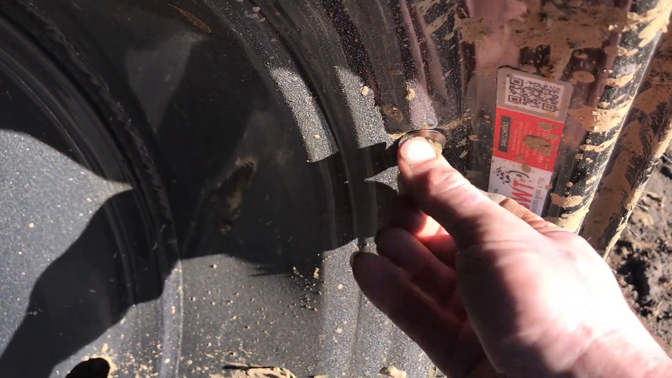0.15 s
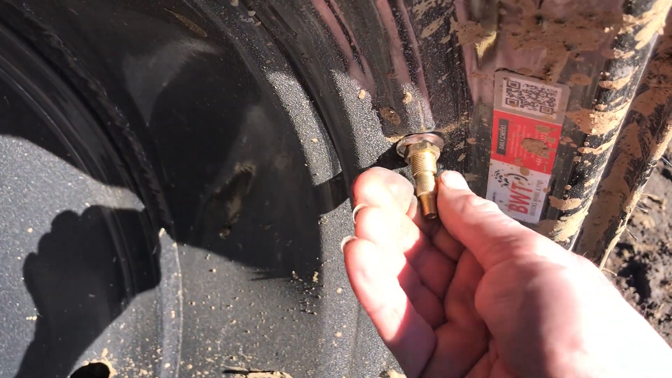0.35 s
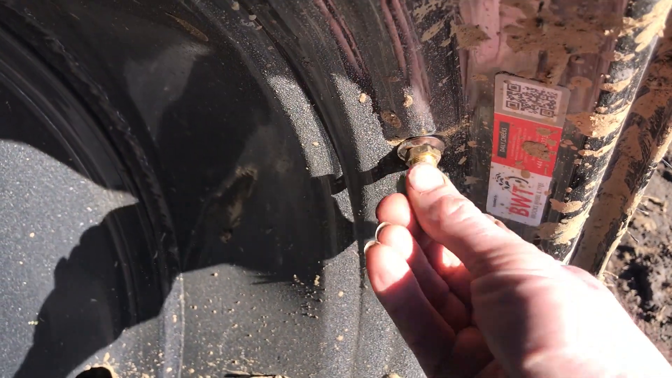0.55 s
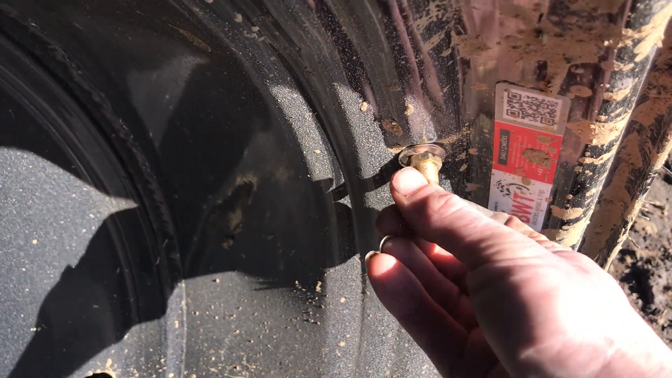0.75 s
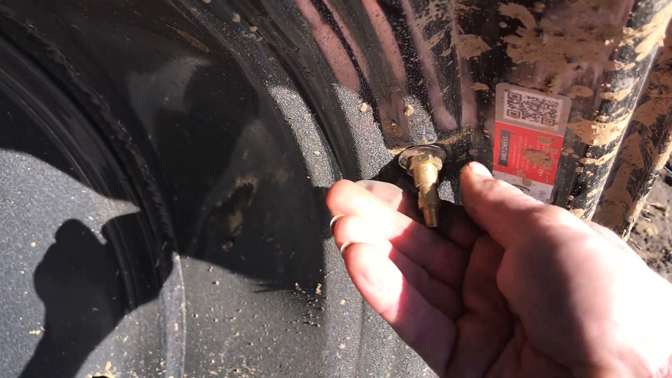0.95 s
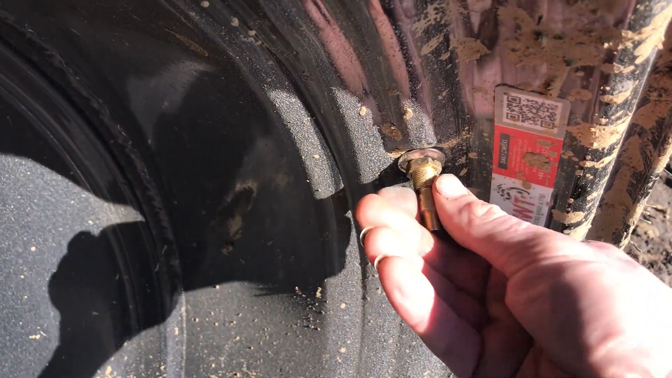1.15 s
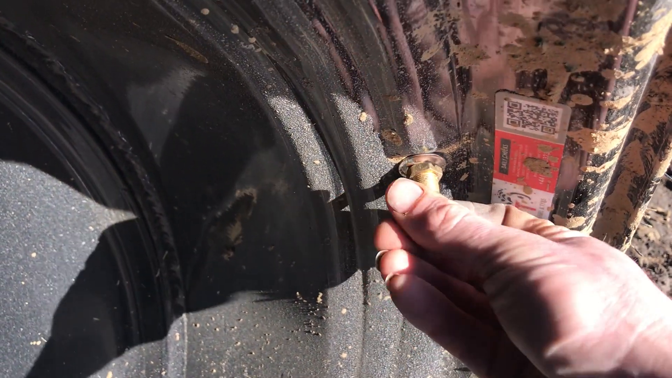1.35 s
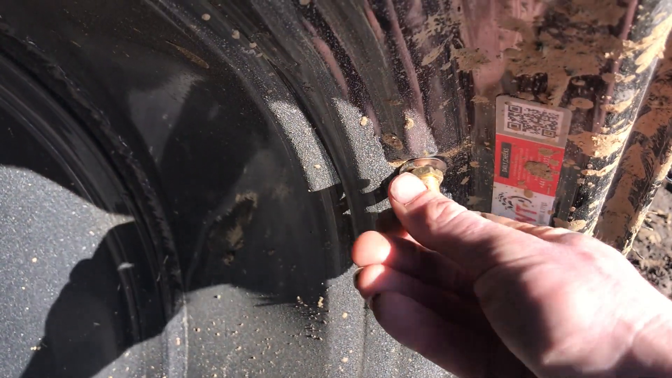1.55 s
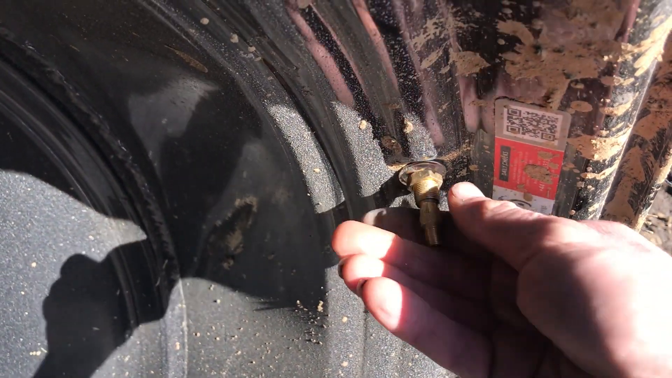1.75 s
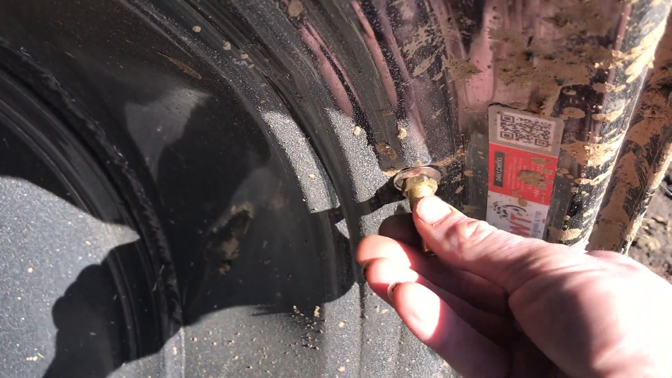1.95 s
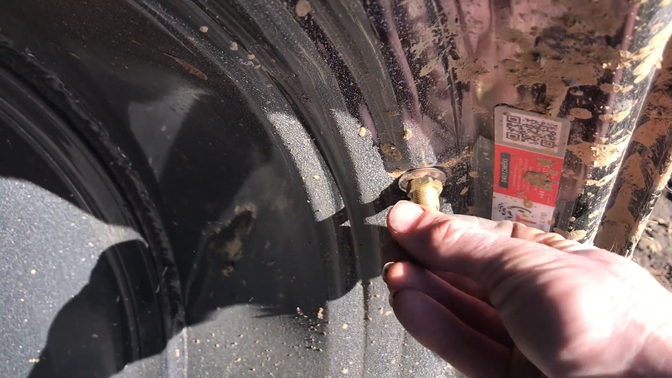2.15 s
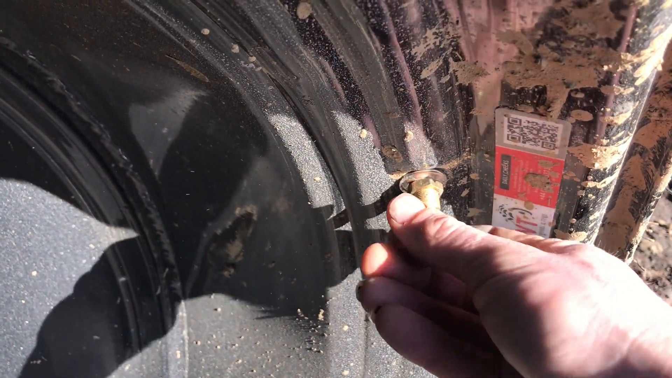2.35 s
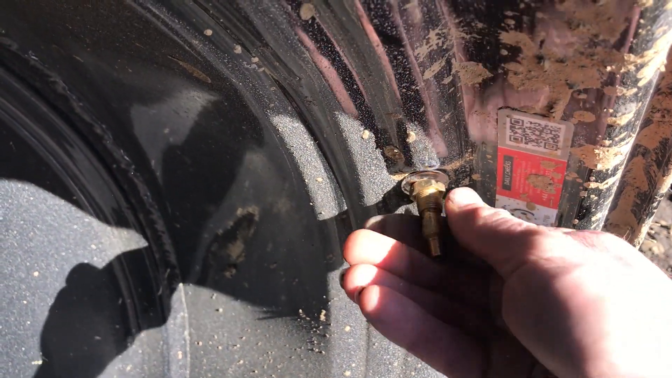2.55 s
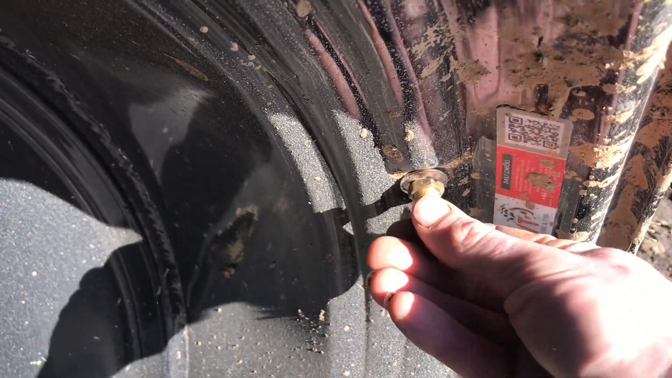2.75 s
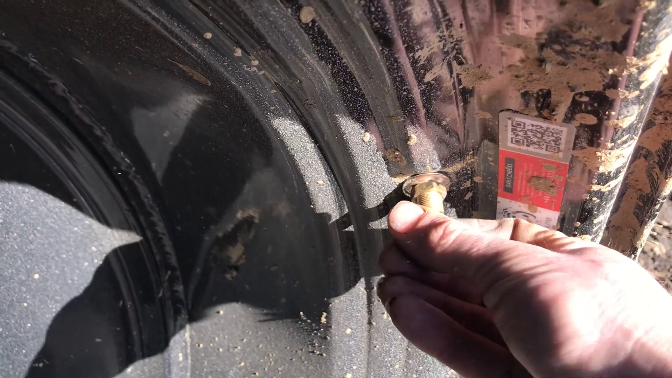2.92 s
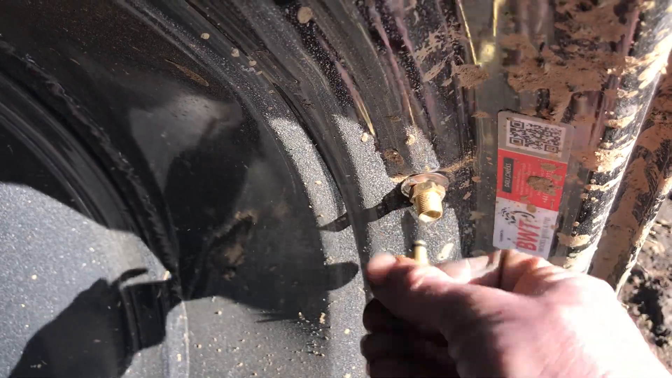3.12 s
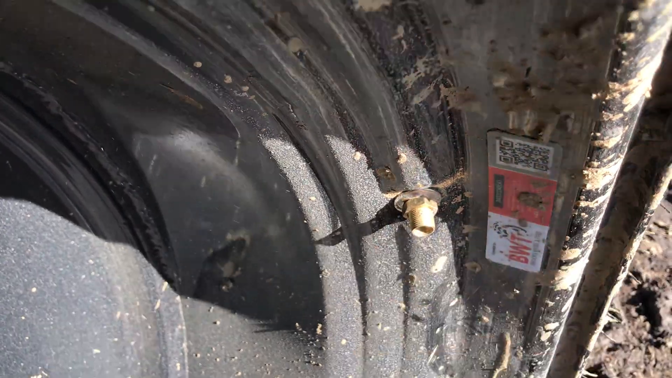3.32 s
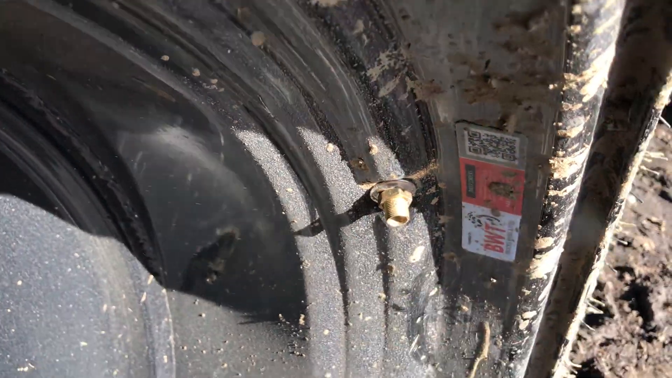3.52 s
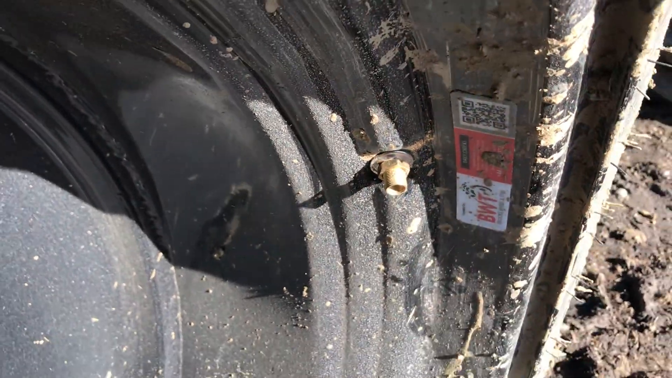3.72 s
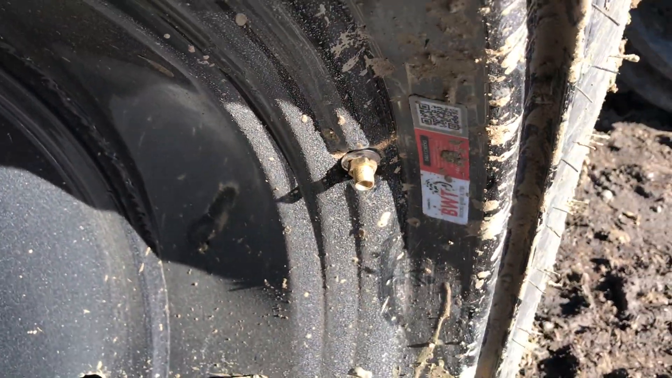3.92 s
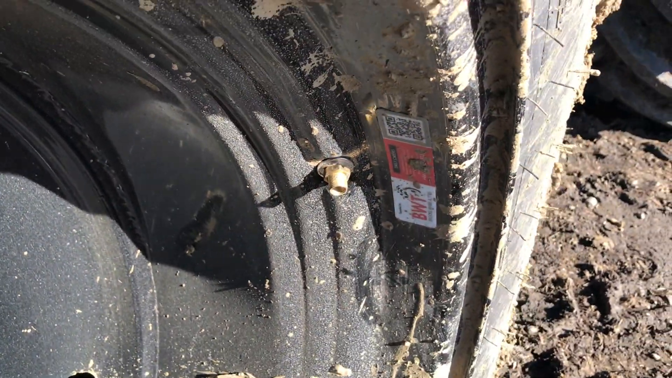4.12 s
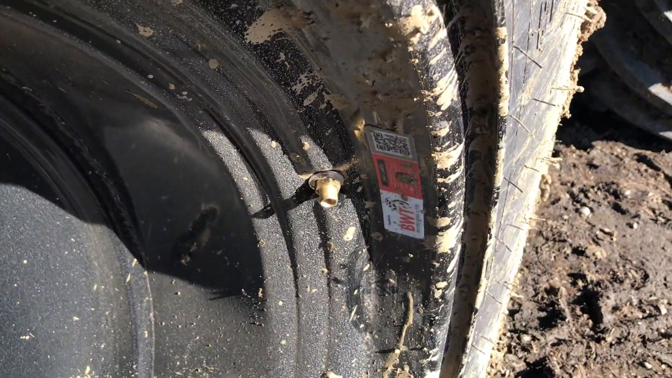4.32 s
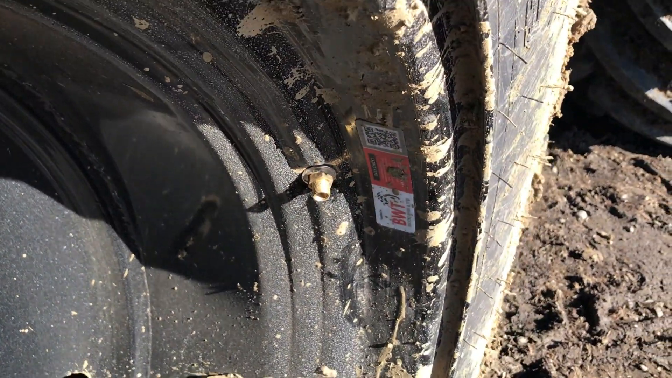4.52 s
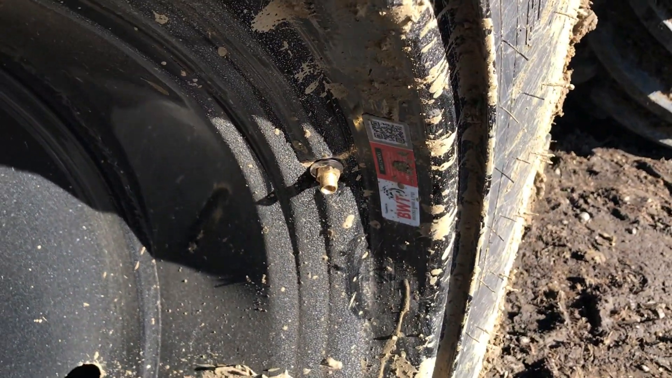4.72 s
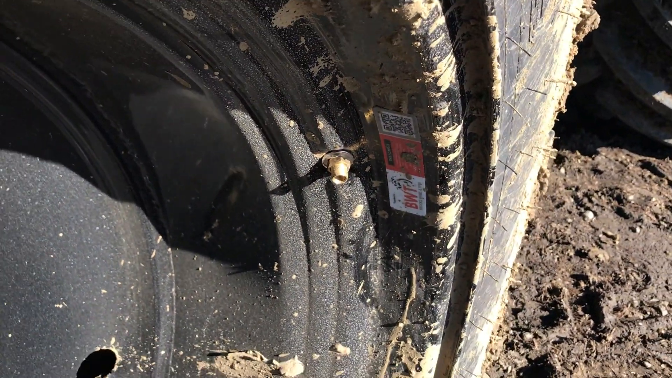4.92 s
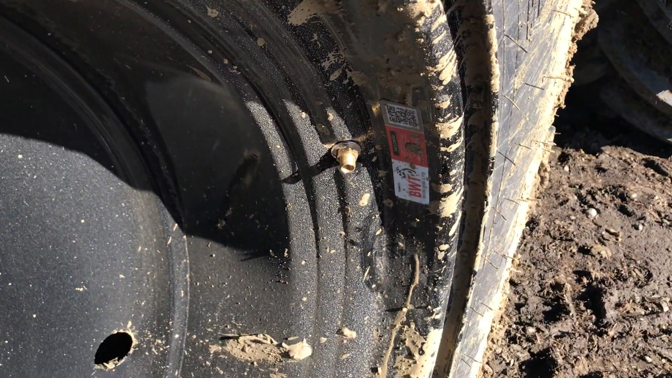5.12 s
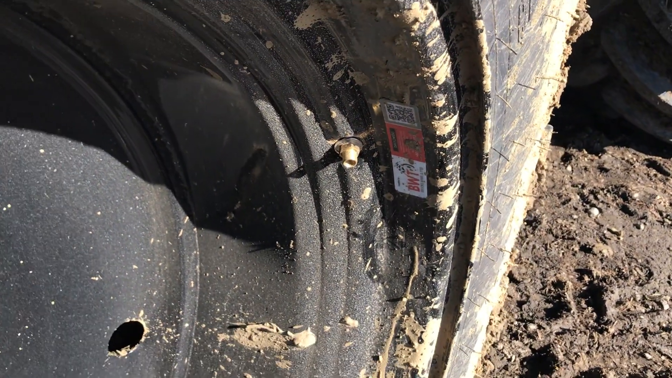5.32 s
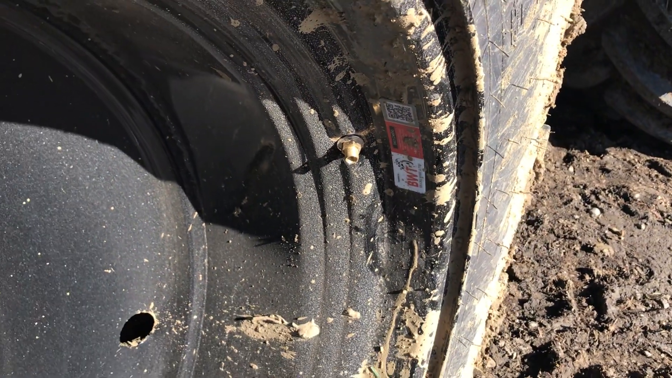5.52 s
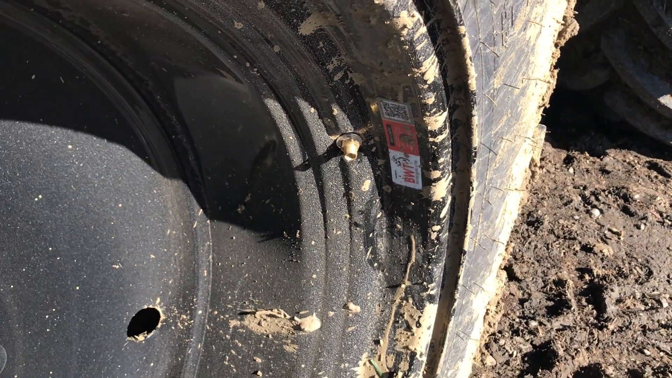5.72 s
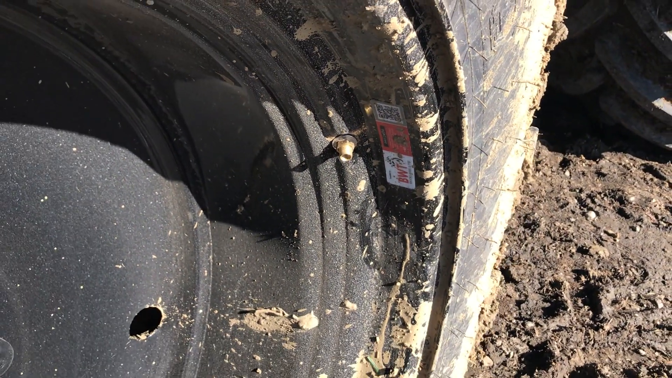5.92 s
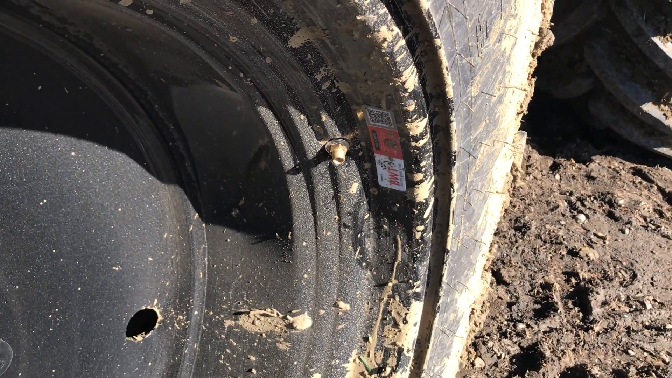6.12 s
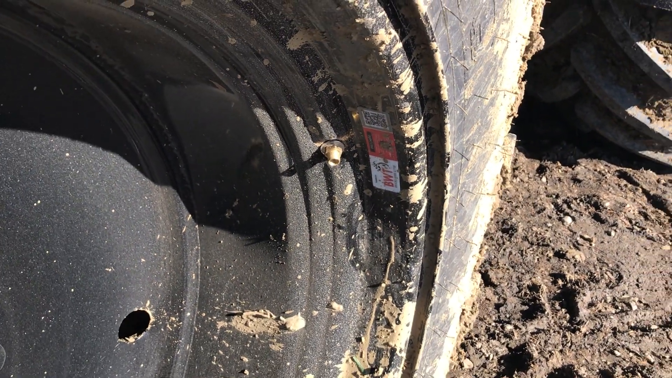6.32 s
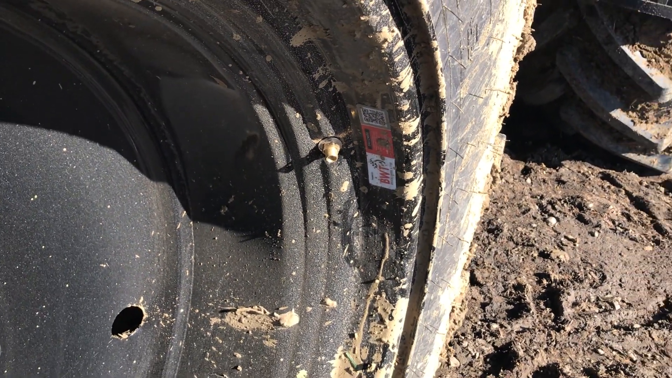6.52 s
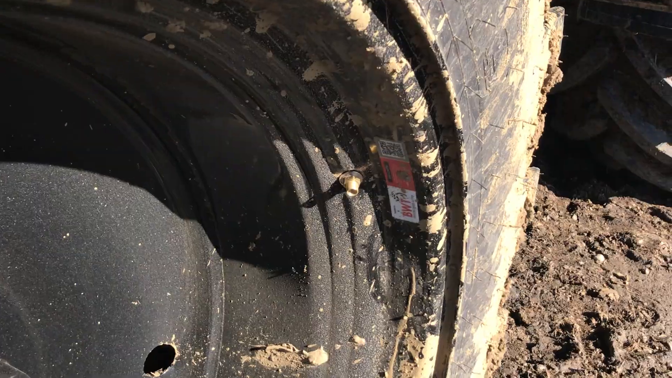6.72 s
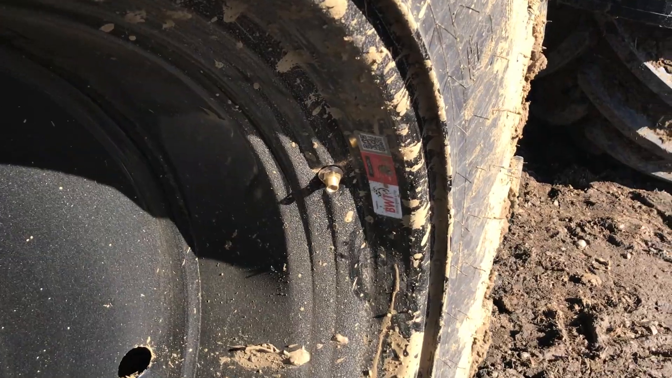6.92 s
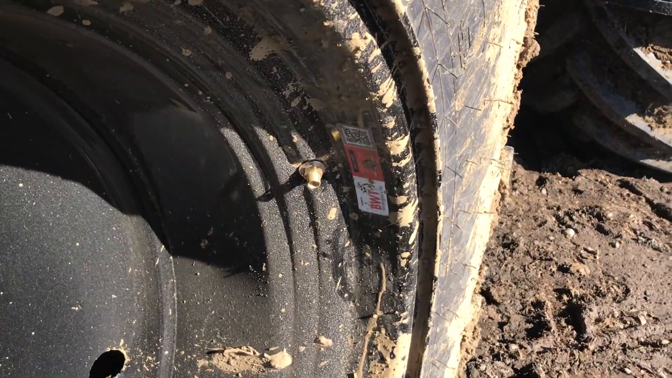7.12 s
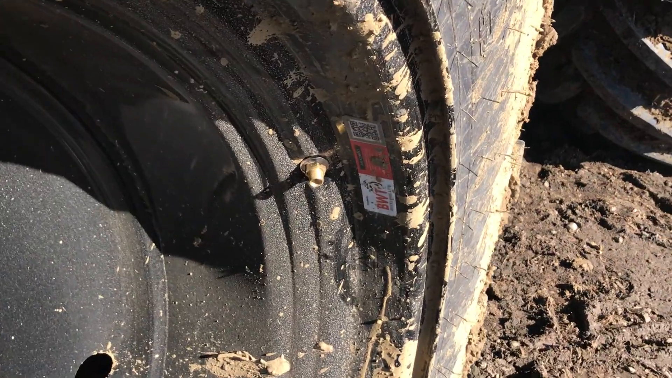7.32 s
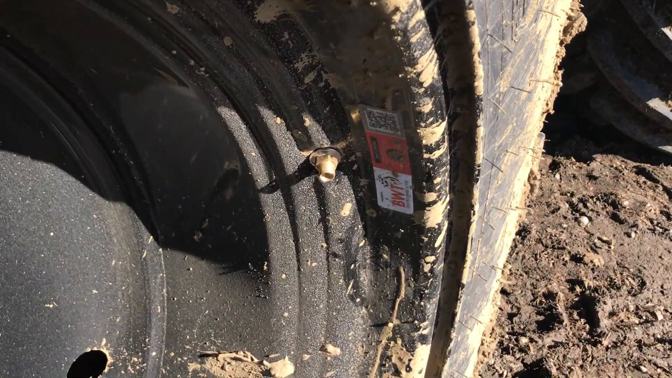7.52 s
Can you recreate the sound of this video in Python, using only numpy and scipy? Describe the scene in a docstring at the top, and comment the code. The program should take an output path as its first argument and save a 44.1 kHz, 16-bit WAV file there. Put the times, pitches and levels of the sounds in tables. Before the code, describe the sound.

Fingers rub and tick at a brass tyre valve, air seeping in wisps, then a pop, a roaring burst and a long steady hiss.

```python
"""An engine idles some way off in a farmyard while fingers rub on a tractor tyre's brass valve.
They slowly unscrew its core: air seeps past the thread in wisps, the core ticks, and the air spurts.
Then the core comes free with a pop, the jet roars against the hand, and the open valve hisses on.
The engine is a set of sines over rumble; air is coloured noise; rubs and ticks are short ringing bursts.
Heard close, in mono, with echoes from the wheel and the ground."""
import sys
import numpy as np
from scipy import signal
from scipy.fft import rfft, irfft, next_fast_len
from scipy.io import wavfile
from scipy.ndimage import map_coordinates

SR = 44100
rng = np.random.default_rng(int(sys.argv[2]) if len(sys.argv) > 2 else 0)


def dump(signal):
    """Clip the signal to [-1, 1] and save it as 16-bit WAV at the path in sys.argv[1]."""
    limited = np.clip(np.atleast_2d(signal).T, -1, 1)
    pcm = np.round(limited * 32767).astype(np.int16)
    wavfile.write(sys.argv[1], SR, pcm)


N = 333396
TIME = np.arange(N) / SR
CUTOFF_HZ = 15750   # top edge of the whole sound
OPEN_S, HAND_LEAVES_S = 3.1235, 3.309   # the core comes free; the hand starts to leave the jet


def from_db(db):
    """Decibels to gain."""
    return 10 ** (np.asarray(db) / 20)


def rms_one(x):
    """Scale to unit rms."""
    return x / np.sqrt(np.mean(x ** 2) + 1e-20)


def in_time(rows):
    """Each column of a table, after its times, as a curve with a value at every sample."""
    s, *columns = np.transpose(rows)
    return [np.interp(TIME, s, c) for c in columns]


def between(start, end, rise, fall):
    """A gate that opens at start and is closed by end, with straight ramps inside."""
    return np.clip((TIME - start) / rise, 0, 1) * np.clip((end - TIME) / fall, 0, 1)


def swell(start, hold_s, attack_s, release_s):
    """Gain that is 1 from start for hold_s; it rises tenfold in attack_s and falls tenfold in release_s."""
    early = np.maximum(start - TIME, 0)
    late = np.maximum(TIME - start - hold_s, 0)
    return 10 ** -np.minimum(early / attack_s + late / release_s, 10)


def drift(rate):
    """Smooth random wandering of rms 1; a higher rate in Hz wanders faster."""
    # drawn at every 40th sample, after a run-in of 2000 draws
    r = np.exp(-80 * np.pi * rate / SR)
    slow = signal.lfilter([1], [1, -2 * r, r * r], rng.standard_normal(N // 40 + 2002))[2000:]
    return np.interp(np.arange(N) / 40, np.arange(len(slow)), rms_one(slow))


def noise(colour):
    """Noise with the given spectrum, rms 1."""
    hz, db = np.transpose(colour)
    size = next_fast_len(N)
    bins = np.maximum(np.arange(size // 2 + 1) * SR / size, 1)
    shape = from_db(np.interp(np.log(bins), np.log(hz), db))
    shape = shape * np.minimum(bins / hz[0], 1) ** 2   # fades out below the first frequency
    shape = shape * (bins < CUTOFF_HZ)
    return rms_one(irfft(rfft(rng.standard_normal(size)) * shape, size)[:N])


def butter(x, hz, kind, order=2):
    """Butterworth filter."""
    return signal.sosfilt(signal.butter(order, hz, kind, fs=SR, output="sos"), x)


def resonance(hz, width_hz):
    """Coefficients of a resonance with gain 1 on top."""
    return signal.iirpeak(hz, hz / width_hz, fs=SR)


def boosted(x, modes):
    """Raise or lower x at each resonance."""
    for hz, width_hz, db in modes:
        x = x + (from_db(db) - 1) * signal.lfilter(*resonance(hz, width_hz), x)
    return x


def swept(x, hz, design, span, size=128):
    """Filter x over a span of time, block by block, while the filter's frequency moves."""
    out, state = np.zeros(N), np.zeros(2)
    for i in range(int(span[0] * SR), int(span[1] * SR), size):
        out[i:i + size], state = signal.lfilter(*design(hz[i]), x[i:i + size], zi=state)
    return out


def hiss(rush_gain, fizz_gain, colour, split_hz):
    """Turbulent air: large eddies give the rush, small ones the fizz above it."""
    rush = rms_one(butter(noise(colour), split_hz, "low", order=4))
    fizz = rms_one(butter(noise(colour), split_hz, "high", order=4))
    return rush_gain * rush + fizz_gain * fizz


# colour of the open-air background: (frequency [Hz], level [dB per Hz])
YARD = [(100, -3), (500, 5), (1500, -0.5), (3000, -5.5), (6000, -10.5), (10000, -15.5), (15500, -34)]


def yard():
    """Faint steady noise of the open air."""
    return from_db(-71.5) * noise(YARD)


ENGINE_HZ, ENGINE_DB = 27.54, -48.5   # turns per second; level
# the idle sags slowly, then dies away as the air takes over
ENGINE_SAGS_S, ENGINE_SAG_DB_PER_S = 2.56, 9
ENGINE_FADES_S, ENGINE_FADE_S = 2.91, 0.22
# tones of the engine and two driven by its belt: (multiple of the turning rate [-], level [dB])
ENGINE_ORDERS = [(2, -5), (3, -24), (4, -16.5), (5, -6.5), (6, -21), (7, -37), (8, -41), (8.79, -26),
                 (9.29, -22), (10, -29.5)]
# colour of the low rumble: (frequency [Hz], level [dB per Hz])
RUMBLE = [(26, -20), (34, -15), (43, 2.5), (58, 6), (75, 1.5), (110, -6.5), (190, -21), (255, -12.5),
          (300, -24.5), (390, -24.5), (480, -37.5), (900, -57)]
# strength of the low rumble: (time [s], level [dB])
RUMBLE_LEVEL = [(.2, -3), (.45, -2), (.9, -1.5), (1.4, -7), (1.65, -1.5), (2.2, -2), (2.6, -4)]


def engine():
    """Tones at multiples of a slightly unsteady turning rate, over a lumpy rumble."""
    turns = np.cumsum(ENGINE_HZ * (1 + 0.0045 * drift(3.6))) / SR
    tones = 0
    for multiple, db in ENGINE_ORDERS:
        gain = from_db(db + 1.2 * drift(9.3)) * np.sqrt(2)   # a sine of peak sqrt(2) has rms 1
        tones = tones + gain * np.sin(2 * np.pi * (multiple * turns + rng.random()))
    rumble = from_db(in_time(RUMBLE_LEVEL)[0] + 1.6 * drift(10.0)) * noise(RUMBLE)
    level_db = ENGINE_DB - ENGINE_SAG_DB_PER_S * np.maximum(TIME - ENGINE_SAGS_S, 0)
    return from_db(level_db) * (tones + rumble) * swell(0, ENGINE_FADES_S, 1, ENGINE_FADE_S)


RUB_RISE_S, RUB_T60_S = 0.0078, 0.076   # T60: time to die away by 60 dB
RUB_GRAIN_DB = 6   # spread of the loudness as skin sticks and slips
# fingers rubbing on the stem: (time [s], level [dB], pitch [Hz])
RUBS = [(.044, -49.5, 1180), (.169, -53.5, 1450), (.258, -55, 1830), (.58, -55, 1100), (.735, -62, 700),
        (.76, -61, 850), (.816, -59, 780), (.858, -61, 1450), (.89, -58, 1900), (.97, -58, 3400),
        (1.222, -54, 1620), (1.335, -62, 2600), (1.379, -52, 1240), (1.727, -57, 686), (2.182, -47, 1890),
        (2.239, -47, 1440), (2.41, -43.5, 2700)]
# resonances of every rub: (multiple of its pitch [-], width as a share of that [-], level [dB])
RUB_MODES = [(1, 0.31, 7), (1.5, 0.36, -25), (2.4, 0.44, -24)]


def rubs():
    """Skin sticks and slips on the stem: a grainy scuff that swells and dies in a few resonances."""
    out, t = np.zeros(N), np.arange(-SR // 30, SR // 5) / SR
    rise, fall = np.exp(-np.abs(t) / RUB_RISE_S), from_db(-60 * np.abs(t) / RUB_T60_S)
    shape = np.where(t < 0, rise, fall)
    slips = from_db(RUB_GRAIN_DB * drift(220))
    for s, db, pitch_hz in RUBS:
        at = max(int((s + t[0]) * SR), 0)
        scuff = rng.standard_normal(len(t)) * shape * slips[at:at + len(t)]
        rub = 0
        for multiple, width, mode_db in RUB_MODES:
            mode_hz = multiple * pitch_hz
            rub = rub + from_db(mode_db) * signal.lfilter(*resonance(mode_hz, width * mode_hz), scuff)
        rub = butter(rub, [.55 * pitch_hz, 3.2 * pitch_hz], "band")
        out[at:at + len(t)] += from_db(db) * rub / np.abs(rub).max()
    return out


CUP_ATTACK_S, CUP_RELEASE_S = 0.39, 0.3   # times for a tenfold rise and fall
# resonances of the hollow of the cupped hand: (frequency [Hz], width [Hz], level [dB])
CUP_MODES = [(265, 42, -1), (347, 73, -5.5), (690, 230, -7)]
# the hand closes round the stem: (time [s], hold [s], level [dB])
CUPPINGS = [(2.19, 0.04, -64.5), (2.57, 0.084, -58), (2.986, 0.054, -60.5)]


def cupped_hand():
    """The draught of the leak rings in the hollow of the hand."""
    draught = rng.standard_normal(N)
    hollow = sum(from_db(db) * signal.lfilter(*resonance(hz, width), draught) for hz, width, db in CUP_MODES)
    swells = [from_db(db) * swell(s, hold_s, CUP_ATTACK_S, CUP_RELEASE_S) for s, hold_s, db in CUPPINGS]
    closed = np.max(swells, axis=0)
    return rms_one(butter(hollow, 1140, "low")) * closed * between(-1, 3.06, .1, 0.026)


LEAK_FIZZ_DB = -1.5   # the steady leak's fizz over its rush
WISP_ATTACK_S, WISP_RELEASE_S = 0.046, 0.029   # times for a tenfold rise and fall
SLIT_WIDTH_HZ, SLIT_BOOST_DB = 1500, 8
# colour of the leaking air: (frequency [Hz], level [dB per Hz])
SEEP_COLOUR = [(400, -32), (800, -6.5), (1600, 2), (2500, -0.5), (4000, 0), (6200, 2), (8000, -1.5),
               (10000, -3.5), (13000, -3.5), (15500, -7)]
# steady seep past the thread, growing unevenly: (time [s], level [dB])
LEAK = [(.1, -76), (1.1, -82), (1.48, -66), (1.72, -68.5), (2.0, -63.5), (2.07, -62.5), (2.16, -60),
        (2.52, -58.5), (2.59, -66), (2.72, -65), (2.84, -53), (3.04, -50.5), (3.11, -58)]
# sizzle of the narrow thread: (frequency [Hz], width [Hz], boost [dB])
THREAD_MODES = [(13300, 3500, 2)]
# wisps let out as the fingers rock the core:
# (time [s], hold [s], rush level [dB], fizz level [dB], pitch of the slit [Hz])
WISPS = [(.01, 0.05, -62, -71, 6070), (0.455, 0.049, -74, -71, 9000), (0.56, 0.026, -66.5, -75, 5800),
         (0.636, 0.031, -64.5, -65, 6140), (1.181, 0.041, -70, -67, 8900), (1.322, 0.083, -63.5, -71, 6200),
         (1.494, .01, -82, -70, 12500), (1.785, 0.033, -66, -72, 6000), (2.024, 0.019, -55, -58, 7800),
         (2.165, .11, -57, -64, 6300), (2.302, 0.069, -71, -63, 13000), (2.457, 0.082, -60, -52.5, 5540),
         (2.871, 0.032, -48.5, -45.5, 11900)]


def seep():
    """A thin, sputtering leak through the thread, with wisps each coloured by its own slit."""
    steady = rms_one(hiss(1, from_db(LEAK_FIZZ_DB), SEEP_COLOUR, split_hz=4350))
    steady = from_db(in_time(LEAK)[0]) * boosted(steady, THREAD_MODES)
    rush = hiss(0.8, 0, SEEP_COLOUR, split_hz=4600)
    fizz = hiss(0, 1, SEEP_COLOUR, split_hz=3800)
    wisps = 0
    for s, hold_s, rush_db, fizz_db, slit_hz in WISPS:
        whistle = rms_one(boosted(fizz, [(slit_hz, SLIT_WIDTH_HZ, SLIT_BOOST_DB)]))
        air = from_db(rush_db) * rush + from_db(fizz_db) * whistle
        wisps = wisps + air * swell(s, hold_s, WISP_ATTACK_S, WISP_RELEASE_S)
    wisps = butter(wisps, .45 * SR, "low")
    sputter = from_db(1.14 * drift(60))
    return (steady + wisps) * sputter * (TIME < OPEN_S)


CLICK_RISE_S, CLICK_T60_S = 0.0006, 0.012
CLICK_TAIL_DB, CLICK_TAIL_T60_S = -19, 0.096   # the thread scrapes on after each tick
# the brass core ticking in the stem: (time [s], level [dB], pitch [Hz])
CLICKS = [(2.1263, -43, 1040), (2.153, -40, 1240), (2.313, -50, 900), (2.426, -35.5, 1800),
          (2.545, -29.5, 995)]
# ringing tones of every tick: (multiple of its pitch [-], level [dB])
TICK_MODES = [(1, 0), (1.32, -1), (1.6, -8), (2, -3), (2.3, -5), (3, -12), (3.6, -14)]


def ticks():
    """The core knocks in the stem: a compact ring, damped by the fingers, and a faint scrape."""
    out, t = np.zeros(N), np.arange(SR // 5) / SR
    shape = (1 - np.exp(-t / CLICK_RISE_S)) * from_db(-60 * t / CLICK_T60_S)
    for s, db, pitch_hz in CLICKS:
        ring = 0
        for i, (multiple, mode_db) in enumerate(TICK_MODES):
            tone = np.sin(2 * np.pi * multiple * pitch_hz * t)
            ring = ring + (-1) ** i * from_db(mode_db) * shape * tone
        scrape = rms_one(butter(rng.standard_normal(len(t)), [.8 * pitch_hz, 2.2 * pitch_hz], "band"))
        scrape = scrape * from_db(CLICK_TAIL_DB - 60 * t / CLICK_TAIL_T60_S)
        at = int(s * SR)
        out[at:at + len(t)] += from_db(db) * (ring / np.abs(ring).max() + scrape)
    return out


SIZZLE_WIDTH_HZ, SPUTTER_DB = 1200, 2   # the sputter is a quick flutter of the level
# colour of the spurting air: (frequency [Hz], level [dB per Hz])
SPURT_COLOUR = [(200, -31), (600, -26), (1000, -11), (1700, -3), (2500, -3), (3500, -8), (4200, -3.5),
                (5200, 0.5), (6700, 3.5), (7700, -3), (10000, -12), (12000, -9.5), (15500, -18)]
# whistle of the narrow gap round the core: (frequency [Hz], width [Hz], boost [dB])
GAP_MODES = [(1024, 63, 9), (1700, 430, 8.5), (2400, 160, 2.5), (4160, 160, 5.5), (6000, 260, -5)]
# a puff with a sharp spit on top: (time [s], hold [s], level [dB], tenfold rise [s], tenfold fall [s],
# pitch of its sizzle [Hz], boost of the sizzle [dB])
SPURTS = [(2.899, 0.1, -38.5, 0.037, 0.061, 13500, 5), (2.911, 0.016, -23.5, 0.019, 0.035, 11100, 3.5)]


def spurt():
    """The loose core lets air spit through the narrow gap around it."""
    out = 0
    for s, hold_s, db, attack_s, release_s, sizzle_hz, sizzle_db in SPURTS:
        air = rms_one(boosted(noise(SPURT_COLOUR), GAP_MODES + [(sizzle_hz, SIZZLE_WIDTH_HZ, sizzle_db)]))
        out = out + from_db(db) * swell(s, hold_s, attack_s, release_s) * air
    return out * from_db(SPUTTER_DB * drift(140))


BLAST_DB, BLAST_RELEASE_S = -33, 0.13
BLAST_FULL_S, BLAST_BUILD_S = 3.143, 0.069   # the roar builds just after the crack
# the top edge of the roar sinks as the jet slides off the fingers
EDGE_NEAR_HZ, EDGE_FAR_HZ, EDGE_SINKS_S, EDGE_SINK_TIME_S = 25000, 3800, 3.255, 0.044
HOLLOW_WIDTH, FINGER_GAP_WIDTH, FINGER_GAP_DB = 0.35, .2, 5   # widths as a share of the pitch
HOLLOW_OVERTONE, OVERTONE_DB = 2.4, 2   # second resonance: multiple of the first, boost
# buffeting grows as the hollow deepens; its level is given for a hollow of 1 kHz
BUFFET_DB, BUFFET_DB_PER_OCTAVE, BUFFET_RELEASE_S = -49, 5, 0.28
# colour of the roar: (frequency [Hz], level [dB per Hz])
BLAST_COLOUR = [(100, -37), (400, -4.5), (600, -1.5), (780, -2.5), (1000, -1.5), (2000, -0.5), (4000, 2),
                (6500, -0.5), (8500, -0.5), (12000, -3), (15500, -11)]
# colour of the air thudding on the palm: (frequency [Hz], level [dB per Hz])
BUFFET = [(25, -22), (70, -15), (250, 3), (500, -17), (1000, -13.5)]
# ringing of the hand's hollow as it closes and opens: (time [s], pitch [Hz], boost [dB])
HOLLOW = [(3.124, 1980, 11.5), (3.15, 1740, 8), (3.178, 1200, 10.5), (3.205, 870, 5), (3.235, 500, 9),
          (3.26, 1050, 6.5), (3.285, 1820, 3.5), (3.318, 1950, 8), (3.345, 1330, 9.5), (3.38, 660, 8.5)]
# sharp ringing of the gap between the fingers, falling as they draw away: (time [s], pitch [Hz])
FINGER_GAP = [(3.124, 6200), (3.19, 6600), (3.245, 7150), (3.275, 5700), (3.302, 4500), (3.35, 3530),
              (3.4, 2700)]


def blast():
    """The jet breaks on the hand: the hollow's pitch moves, and the roar dulls as the hand leaves."""
    hollow_hz, hollow_db = in_time(HOLLOW)
    gap_hz, = in_time(FINGER_GAP)
    nearness = np.exp(-np.maximum(TIME - EDGE_SINKS_S, 0) / EDGE_SINK_TIME_S)
    edge_hz = np.minimum(EDGE_FAR_HZ + (EDGE_NEAR_HZ - EDGE_FAR_HZ) * nearness, .45 * SR)
    span = (3.1, 3.6)
    modes = [(hollow_hz, HOLLOW_WIDTH, hollow_db),
             (HOLLOW_OVERTONE * hollow_hz, HOLLOW_WIDTH, OVERTONE_DB),
             (gap_hz, FINGER_GAP_WIDTH, FINGER_GAP_DB)]
    roar = noise(BLAST_COLOUR)
    for centre_hz, width, db in modes:
        ringing = swept(roar, centre_hz, lambda hz: resonance(hz, width * hz), span)
        roar = roar + (from_db(db) - 1) * ringing
    dulled = swept(roar, edge_hz, lambda hz: signal.butter(2, hz, fs=SR), span)
    # make up for the power lost in dulling; a little fizz slips past the fingers
    roar = dulled * np.sqrt(1 + (2900 / edge_hz) ** 2) + from_db(-10.0) * noise(BLAST_COLOUR)
    roar = roar * from_db(BLAST_DB + 0.39 * drift(50)) * swell(0, HAND_LEAVES_S, 1, BLAST_RELEASE_S)
    depth = np.log2(1000 / hollow_hz)   # octaves below 1 kHz
    buffet = noise(BUFFET) * from_db(BUFFET_DB + BUFFET_DB_PER_OCTAVE * depth)
    buffet = buffet * swell(0, HAND_LEAVES_S, 1, BUFFET_RELEASE_S)
    opening = between(OPEN_S, 3.58, 0.0012, 0.028) * swell(BLAST_FULL_S, N / SR, BLAST_BUILD_S, 1)
    return (roar + buffet) * opening


THUMP_DB, CRACK_DB, GUST_DB = -26.5, -29, -33


def pop():
    """The first slug of air out of the stem: a short crack, one low thump and a gust on the palm."""
    age = np.maximum(TIME - OPEN_S - .0007, 0)
    slug = np.exp(-age / 0.0023) - np.exp(-age / 0.00011)
    thump = butter(slug, [65, 450], "band")
    crack = noise(BLAST_COLOUR) * np.exp(-age / 0.0016) * (age > 0)
    gust = noise(BUFFET) * np.exp(-age / 0.01) * (age > 0)
    return from_db(THUMP_DB) * thump + from_db(CRACK_DB) * crack + from_db(GUST_DB) * gust


# colour of the free jet's low eddies: (frequency [Hz], level [dB per Hz])
EDDIES = [(25, -26), (45, -3.5), (80, 2.5), (150, -3), (280, -7), (450, -12.5), (900, -20)]
# strength of the low eddies: (time [s], level [dB])
EDDY_LEVEL = [(3.4, -56.5), (4.6, -61), (6.2, -60), (6.8, -61), (7.3, -59)]


def low_eddies():
    """Large slow eddies of the free jet give a low rumble."""
    return from_db(in_time(EDDY_LEVEL)[0]) * noise(EDDIES) * between(3.04, 9, 0.2, .1)


JET_FULL_S, JET_ATTACK_S = 3.53, 0.35
# strength of the free jet: (time [s], rush level [dB], fizz level [dB])
JET = [(3.5, -45.5, -43.5), (3.63, -44.5, -42.5), (4.3, -46, -43), (6.21, -42, -39.5), (6.63, -42, -39),
       (6.76, -43.5, -41), (7.56, -43.5, -40.5)]
# colour of the free jet: (frequency [Hz], level [dB per Hz])
JET_COLOUR = [(250, -14.5), (480, -17), (800, -8.5), (1200, -2), (2300, -1), (3700, 1), (6200, -0.5),
              (9300, -3.5), (12700, -7), (15500, -15)]


def jet():
    """The open valve's turbulent air swells up as the hand leaves and hisses on with a slight flutter."""
    rush_db, fizz_db = in_time(JET)
    air = hiss(from_db(rush_db), from_db(fizz_db), JET_COLOUR, split_hz=3990)
    air = air * from_db(0.67 + 0.51 * drift(32))
    return air * swell(JET_FULL_S, N / SR, JET_ATTACK_S, 1) * (TIME > OPEN_S)


# echoes from the dished steel wheel and the ground: (delay [s], level [dB], top edge [Hz])
ECHOES = [(.0016, -40.5, 9000), (.0023, -41, 9000), (.0031, -28, 12000), (.0039, -39, 12000),
          (.0059, -22.5, 11900), (.00728, -13.5, 2500), (0.011, -21, 12000), (0.012, -33, 9900)]
# steel rim ringing along: (frequency [Hz], width [Hz], boost [dB])
RIM_MODES = [(570, 16, 1.5), (700, 38, 0.5), (804, 11, -4)]


def wheel(x):
    """Close echoes comb the sound; their paths waver as the microphone moves in the hand."""
    out, samples = x, np.arange(N)
    for delay_s, db, edge_hz in ECHOES:
        lag = (delay_s + .00006 * drift(.5)) * SR
        dull = butter(x, edge_hz, "low", order=1)
        out = out + from_db(db) * map_coordinates(dull, [samples - lag], order=3)
    return boosted(out, RIM_MODES)


SCATTER_DELAYS_S, SCATTER_SWAY_S = (.0008, .007), .00007   # range of delays; rms sway of each
# many faint echoes off the steps of the rim, all together: (time [s], level [dB])
SCATTER = [(3.3, -12), (5.2, -11.5), (6, -15)]


def scattered(x, count=12):
    """Faint echoes whose paths sway with the microphone, so that ripples glide through the hiss."""
    echoes = 0
    for delay_s in rng.uniform(*SCATTER_DELAYS_S, count):
        lag = (delay_s + SCATTER_SWAY_S * drift(.4)) * SR
        echoes = echoes + rng.choice([-1, 1]) * np.interp(np.arange(N) - lag, np.arange(N), x)
    return x + from_db(in_time(SCATTER)[0]) * butter(echoes, 550, "high") / np.sqrt(count)


# half length of a dip, and the edges of the bands that dip
THINNING_S, THIN_BASS_HZ, THIN_TREBLE_HZ = 0.013, 1050, 5500
# the hiss thins for an instant; a negative dip is a rise: (time [s], bass dip [dB], treble dip [dB])
THINNING = [(1.402, 1, 3), (2.342, 7, 3), (2.403, -5, 16), (3.573, 11, 10), (3.746, 44, 2), (3.942, 16, 2),
            (4.157, 5, 1), (4.338, 4, 3), (4.411, 10, 2), (4.526, 9, 2), (4.641, 12, 1), (4.863, 34, 3),
            (5.015, 12, 1), (5.222, 14, 1), (6.428, 16, 0), (6.94, 10, 1)]


def thinned(air):
    """The bass and treble of the hiss dip briefly, each by its own amount, while the middle stays."""
    bass_db, top_db = 0, 0
    for s, bass_dip_db, top_dip_db in THINNING:
        dip = np.exp(-np.abs((TIME - s) / THINNING_S) ** 3)
        bass_db = bass_db + bass_dip_db * dip
        top_db = top_db + top_dip_db * dip
    # filtered forwards and backwards, so that the bands stay in step
    bass = signal.sosfiltfilt(signal.butter(6, THIN_BASS_HZ, fs=SR, output="sos"), air)
    top = signal.sosfiltfilt(signal.butter(2, THIN_TREBLE_HZ, "high", fs=SR, output="sos"), air)
    middle = air - bass - top
    return bass * from_db(-bass_db) + middle + top * from_db(-top_db)


def scene():
    """Engine, yard and valve, the same in both ears."""
    at_wheel = seep() + cupped_hand() + rubs() + ticks() + spurt() + blast() + jet()
    valve = from_db(-0.85) * scattered(wheel(at_wheel)) + pop()
    mono = engine() + thinned(yard() + valve + low_eddies())
    return np.array([mono, mono])


# dips in the microphone's treble: (frequency [Hz], width [Hz], change [dB])
PORT_DIPS = [(4910, 340, -6), (7720, 710, -4.5), (10460, 570, -6)]


def record(dry):
    """The microphone scoops three dips out of the treble and rounds the highest peaks; the top is cut."""
    coloured = from_db(0.5) * boosted(dry, PORT_DIPS)
    rounded = coloured / (1 + (coloured / .165) ** 4) ** .25   # peaks level off towards .165
    return signal.sosfilt(signal.ellip(12, .1, 70, CUTOFF_HZ, fs=SR, output="sos"), rounded)


dry = scene()
out = record(dry)
dump(out)
```